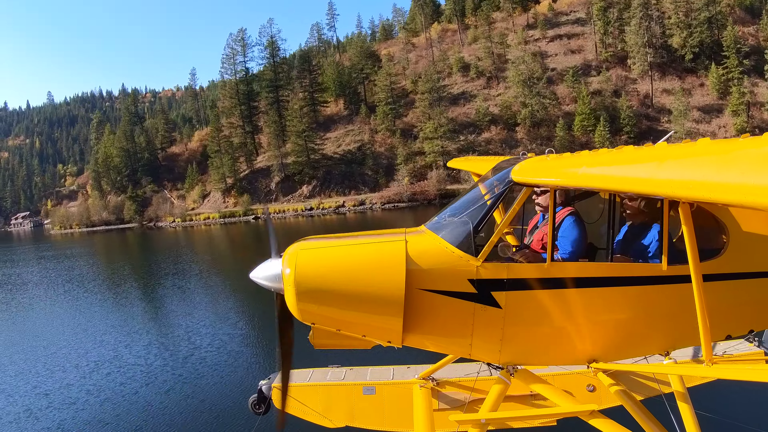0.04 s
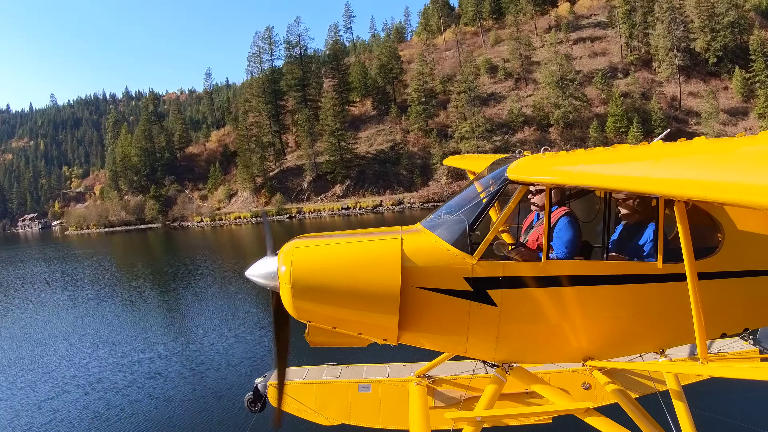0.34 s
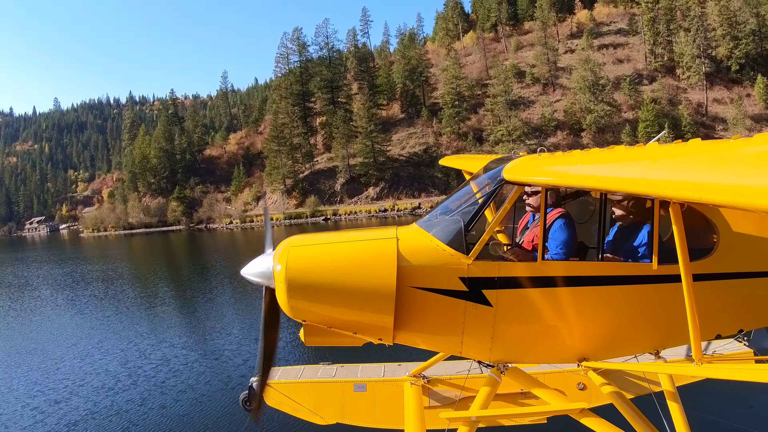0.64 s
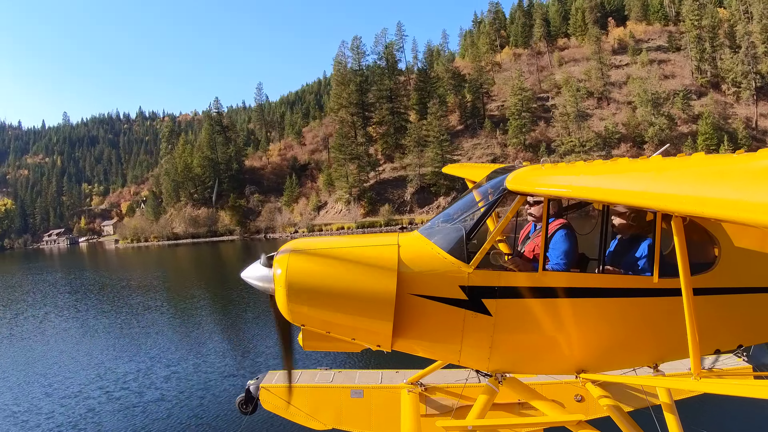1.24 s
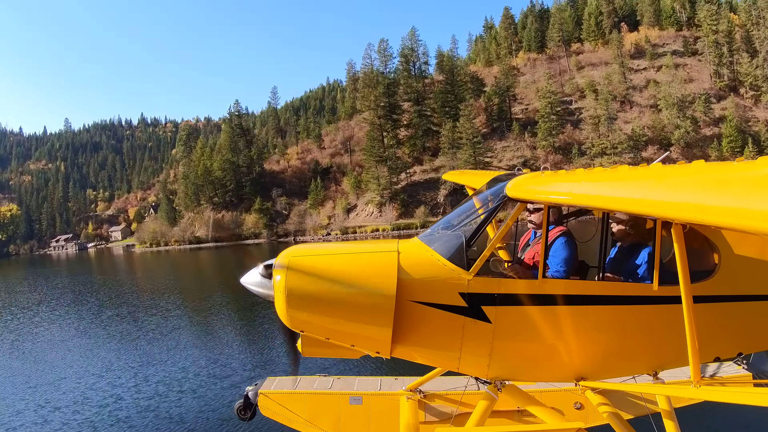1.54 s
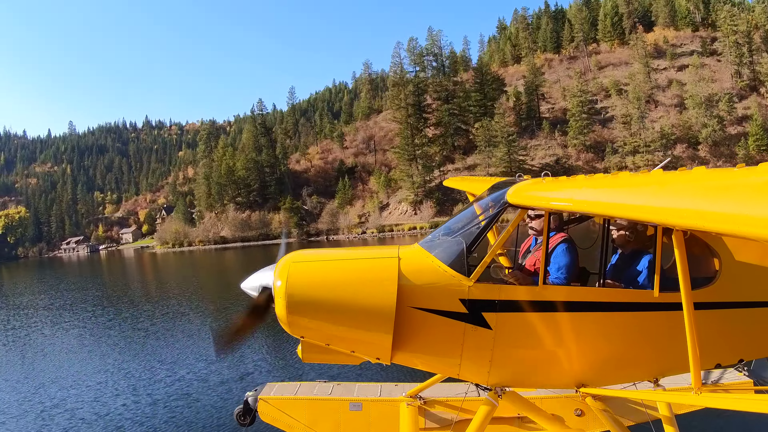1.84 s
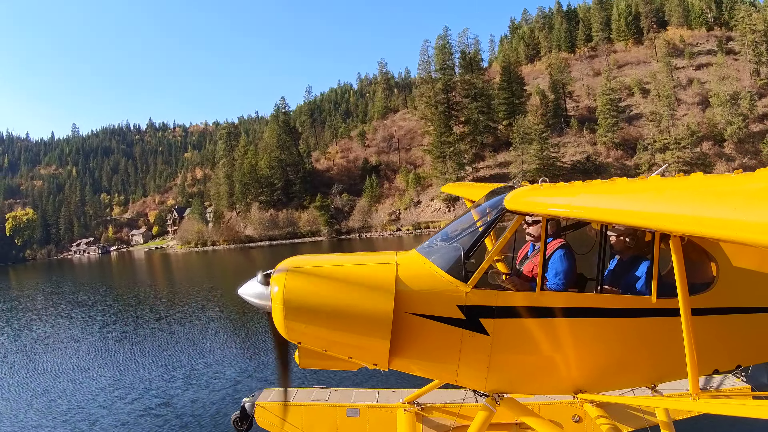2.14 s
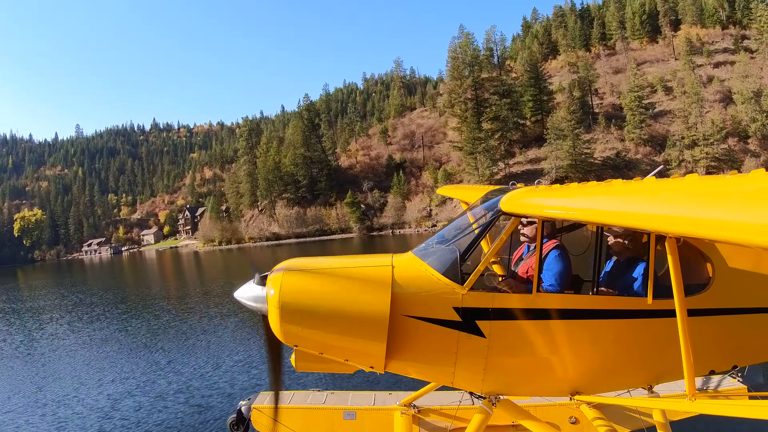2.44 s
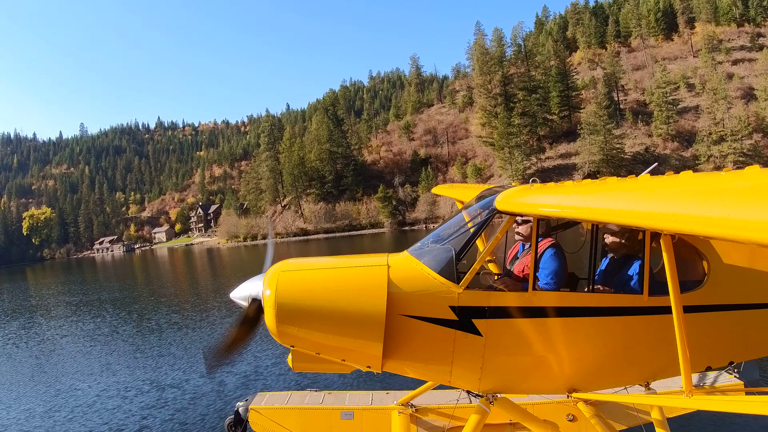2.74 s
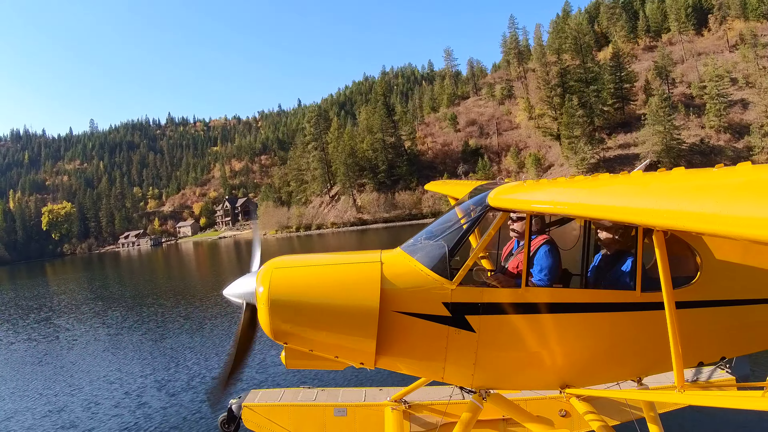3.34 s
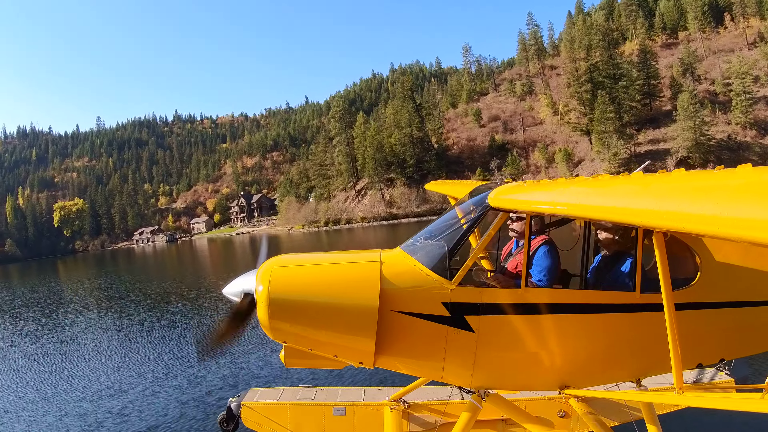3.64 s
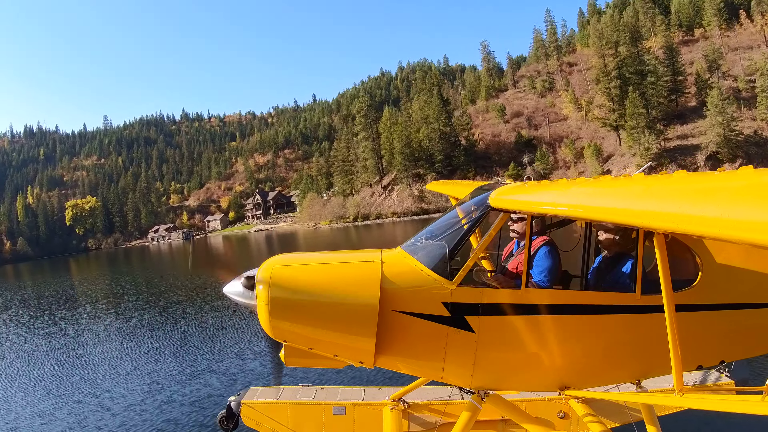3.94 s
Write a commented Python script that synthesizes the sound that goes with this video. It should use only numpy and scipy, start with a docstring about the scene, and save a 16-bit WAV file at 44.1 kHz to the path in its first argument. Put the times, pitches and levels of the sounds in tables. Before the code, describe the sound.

A single-engine floatplane drones over a lake, heard from a microphone in the airstream beside it. At first deep wind buffeting, spitting hiss and small hollow knocks cover it, then the drone swells and climbs in pitch.

```python
"""On a lake, a single-engine floatplane flies low, heard from a camera out in the airstream beside it.
Close up, wind buffets the microphone, rushes, hisses and now and then knocks and rattles the housing.
The drone of engine and propeller climbs out of the wind, rising in pitch.
The camera's fast limiter holds the rumble at one level."""
import sys
import numpy as np
from scipy import signal
from scipy.fft import rfft, irfft, next_fast_len
from scipy.io import wavfile
from scipy.ndimage import uniform_filter1d, minimum_filter1d, map_coordinates

SR = 44100
rng = np.random.default_rng(int(sys.argv[2]) if len(sys.argv) > 2 else 0)


def store_pcm(level_fs):
    """Save levels as 16-bit WAV."""
    pcm = np.round(np.clip(level_fs, -1, 1) * 32767).astype(np.int16)
    wavfile.write(sys.argv[1], SR, np.atleast_2d(pcm).T)


N = 176400

# Strength of the hiss and its spits at the microphone. Each row: time in seconds, relative level in dB.
HISS_STRENGTH = [(0, -44), (.7, -43.5), (1.08, -42.4), (1.26, -43.7), (1.6, -42.3), (1.85, -42.5),
                 (2.3, -43.5), (2.5, -44.5), (3.1, -45), (3.3, -45.3), (3.58, -46), (4, -45.5)]


def amp(db):
    """Decibels to gain."""
    return 10 ** (np.asarray(db) / 20)


def unit(x):
    """Scale to rms 1."""
    return x / np.sqrt(np.mean(x ** 2) + 1e-20)


def along(points, hz):
    """Read (Hz, value) points on a log axis."""
    freqs, values = np.transpose(points)
    return np.interp(np.log(hz + 1), np.log(freqs + 1), values)


def curves(rows):
    """One value per sample for each column after the time."""
    times, *columns = np.transpose(rows)
    return [np.interp(np.arange(N) / SR, times, column) for column in columns]


def humps(rows):
    """Sum of smooth bumps from (centre s, height, width s) rows."""
    t = np.arange(N) / SR
    return sum(height * np.exp(-np.pi * ((t - centre) / width) ** 2) for centre, height, width in rows)


def wobble(rate):
    """A smooth random curve, rate knots a second."""
    return map_coordinates(rng.standard_normal(size=4096), [np.arange(N) * rate / SR], mode="wrap")


def filtered(x, response):
    """Shape x by a gain that depends on frequency."""
    size = next_fast_len(N + SR // 2)
    return irfft(rfft(x, size) * response(np.fft.rfftfreq(size, 1 / SR)), size)[..., :N]


def airflow(spectrum, patchy_db, fine_db=0):
    """Stereo air noise with broad and fine patches of random gain: mono in the bass, wide up top."""
    # Each row: frequency in Hz, likeness of left and right (1 is mono).
    likeness = [(1800, 1), (2600, 1), (3600, 0.59), (5000, 0.44), (8000, 0.55), (15000, 0.2)]

    def patches(bins, frames):
        field = uniform_filter1d(rng.standard_normal(noise.shape[1:]), bins, axis=0)
        return unit(uniform_filter1d(field, frames, axis=1))

    def mid_side_gains(hz):
        spread = np.arccos(np.clip(along(likeness, hz), -1, 1)) / 2
        return amp(along(spectrum, hz)) * [np.ones_like(hz), np.tan(spread)]

    noise = signal.stft(rng.standard_normal((2, N)), nperseg=512)[2]
    flicker_db = patchy_db * patches(bins=16, frames=5) + fine_db * patches(bins=8, frames=2)
    pair = signal.istft(noise * amp(flicker_db), nperseg=512)[1][:, :N]
    mid, side = filtered(pair, mid_side_gains)
    return np.array([mid + side, mid - side]) / np.std(mid)


def buffet():
    """Eddies beat right on the microphone: a deep, lumpy rumble."""
    # Each row: time in seconds, level in dB.
    strength = [(0, -24.5), (1, -24), (1.6, -26), (2.2, -25), (2.8, -27.5), (3.4, -27.5), (4, -28)]
    # Each row: frequency in Hz, relative spectral density in dB.
    spectrum = [(15, -26), (36, -27), (50, -28), (65, -10), (85, -7), (115, -1.5), (150, 1), (190, -2.5),
                (240, -8), (295, -9), (350, -14.8), (420, -21), (550, -28), (900, -39.5), (2000, -99)]
    level_db, = curves(strength)
    return amp(level_db + 1.03 * wobble(rate=25.07)) * airflow(spectrum, patchy_db=-0.5)


def slipstream():
    """Air rushes and hisses close past the microphone; both layers flutter with the same eddies."""
    # Each row: time in seconds, relative level in dB.
    rush_strength = [(0, -44), (.5, -44), (1, -43), (1.25, -44.5), (1.8, -44), (2.3, -46.5), (2.75, -47.5),
                     (3.1, -46.8), (3.42, -46.5), (3.6, -49), (3.78, -48), (3.92, -46.5), (4, -49)]
    # Brief swells of the hiss. Each row: centre in seconds, rise in dB, width in seconds.
    surges = [(.39, 1.6, .03), (.55, 2.2, 0.036), (.83, 1, 0.018), (.885, 1.5, .02), (1.02, 1.7, 0.07),
              (1.49, 1, 0.027), (1.83, 2, .04), (2.27, 3, .025), (2.605, 3.5, 0.022), (2.99, 3, 0.05),
              (3.18, 2.6, .04), (3.395, 3, .055), (3.535, 4, .018), (3.68, 1.8, .08), (3.895, 3.5, 0.039),
              (3.945, 2.5, .02)]
    # Colour of each layer. Each row: frequency in Hz, relative spectral density in dB.
    rush_spectrum = [(150, -22), (400, 4), (600, 2), (820, 3), (1020, -2.5), (1150, -3), (1270, -1),
                     (1400, -5.5), (1850, -4.5), (2100, -8), (2450, -8), (3400, -14.5), (5000, -26.5),
                     (12000, -40)]
    hiss_spectrum = [(1500, -20), (2500, -13), (3500, -11), (4400, -5.2), (5100, -7.2), (6500, -2.5),
                     (7300, -1), (8050, 1.5), (9000, -2), (10500, -4), (15500, -6)]
    rush_gain_db, hiss_gain_db = 6.5, 2.1
    eddies, flutter = wobble(rate=30.4), wobble(rate=140)
    rush_db = curves(rush_strength)[0] + rush_gain_db + 0.093 * eddies + 0.4 * flutter
    hiss_db = curves(HISS_STRENGTH)[0] + hiss_gain_db + humps(surges) + 0.3 * eddies + 0.5 * flutter
    rush = amp(rush_db) * airflow(rush_spectrum, patchy_db=0.9)
    hiss = amp(hiss_db) * airflow(hiss_spectrum, patchy_db=1.75, fine_db=1.17)
    return rush + hiss


def spits():
    """Short splashy spits in the hiss, each a puff of noise in its own treble band."""
    count, gain_db, spread_db, stereo_width = 330, 1.2, 8, 0.7
    low_hz, high_hz, width_hz = 7000, 15700, 750
    mean_rise_s = 0.0032
    out, t = np.zeros((2, N + SR)), np.arange(2048) / SR
    hz = np.fft.rfftfreq(len(t), 1 / SR)
    for when, height, softness, life in rng.uniform(size=(count, 4)):
        centre_hz = low_hz + height * (high_hz - low_hz)
        band = np.exp(-((hz - centre_hz) / width_hz) ** 2)
        mid, side = irfft(rfft(rng.standard_normal((2, len(t)))) * band)
        noise = unit(np.array([mid + stereo_width * side, mid - stereo_width * side]))
        age = t / (mean_rise_s * (0.5 + life))
        puff = noise * age * np.exp(1 - age)
        out[:, int(when * N):][:, :len(t)] += amp(-spread_db * softness) * puff
    level_db, = curves(HISS_STRENGTH)
    return amp(level_db + gain_db) * out[:, :N]


def drone():
    """Engine and propeller alongside: four clean partials of one rising pitch, each wavering in level."""
    # Each row: time in seconds, fundamental in Hz.
    pitch = [(0, 36), (1.3, 44.7), (1.75, 48), (2, 50.3), (2.5, 54), (2.75, 55.3), (3, 56), (3.5, 57),
             (3.75, 57.25), (4, 57.9)]
    # Each row: time in seconds, levels of the first, second and third partials in dB.
    partial_levels = [(0, -62, -52, -49), (1.22, -66, -52, -33.5), (1.48, -61, -30, -42),
                      (2.12, -51, -30.5, -32), (2.33, -52, -29, -31), (2.65, -44, -30, -30.5),
                      (2.85, -42.5, -33, -25), (3.3, -40, -33, -28.5), (3.7, -39, -37, -25.5),
                      (4, -38, -39, -30.5)]
    fourth_db, waver_db = -48, -0.5
    hz, = curves(pitch)
    phase = 2 * np.pi * np.cumsum(hz) / SR
    out = np.zeros(N)
    for harmonic, db in enumerate(curves(partial_levels) + [fourth_db], 1):
        rms = amp(db + waver_db * wobble(rate=5.94))
        out += np.sqrt(2) * rms * np.sin(harmonic * phase + rng.uniform(0, 2 * np.pi))
    return out


def rattles():
    """Longer gusts shake the housing: a throaty swell in its hollow band, pulsing with quick contacts."""
    # Each row: centre in seconds, rms level at the crest in dB, width in seconds.
    gusts = [(.062, -41, .025), (1.22, -38, .032), (1.317, -34, 0.009), (2.398, -35.3, .06),
             (2.46, -36.2, .04), (2.552, -41, 0.028), (3.04, -38.5, 0.042)]
    # The housing's hollow band. Each row: frequency in Hz, relative spectral density in dB.
    housing_band = [(280, -27), (420, -2), (580, -3), (760, -1), (920, 0), (1080, -11), (1600, -35)]
    contacts_per_s, uneven_db = 300, 2.5
    swell = humps([(centre, amp(db), width) for centre, db, width in gusts])
    chatter = amp(uneven_db * wobble(contacts_per_s))
    return swell * unit(chatter * airflow(housing_band, patchy_db=1))


def knocks():
    """Wind jolts the housing: each knock swells quickly and rings roughly at its own hollow pitch."""
    # Each row: start in seconds, peak level in dB, pitch in Hz, time to fall 60 dB in seconds.
    jolts = [(.063, -34.5, 730, .05), (.127, -30.5, 720, 0.055), (.208, -31, 735, 0.054),
             (.306, -28.7, 695, .03), (.887, -31.5, 750, .03), (1.203, -30, 735, .03),
             (1.2945, -24, 700, .019), (1.3155, -26.5, 820, .014), (1.378, -25.5, 755, .08),
             (1.476, -33, 676, .05), (2.5255, -26, 740, 0.01), (3.463, -29, 740, 0.012)]
    attack_s, roughness_rad = 0.0023, 0.35
    out, t = np.zeros(N + SR), np.arange(SR // 8) / SR
    for start, db, hz, t60 in jolts:
        envelope = (1 - np.exp(-t / attack_s)) * amp(-60 * t / t60)
        jitter = roughness_rad * wobble(rate=400)[:len(t)]
        ring = np.sin(2 * np.pi * hz * t + jitter)
        out[int(start * SR):][:len(t)] += amp(db) * envelope / envelope.max() * ring
    return out[:N]


def scene():
    """At the microphone: wind on both channels; drone, knocks and rattles in the middle."""
    return buffet() + slipstream() + spits() + drone() + knocks() + rattles()


def record(dry):
    """The camera's fast look-ahead limiter, pressing hardest on the bass, then its band limit."""
    ceiling_db, hold_s = -17.5, 0.0056
    split_hz, top_hz = 450, 15900
    treble_share = 0.34  # the treble takes only this share of the cut in dB
    peak = np.abs(dry).max(axis=0)
    needed_gain = np.minimum(1, amp(ceiling_db) / (peak + 1e-9))
    span = int(hold_s * SR)
    gain = uniform_filter1d(minimum_filter1d(needed_gain, 2 * span), span)
    bass = filtered(dry, lambda hz: 1 / (1 + (hz / split_hz) ** 4))
    limited = bass * gain + (dry - bass) * gain ** treble_share
    return filtered(limited, lambda hz: hz < top_hz)


dry = scene()
out = record(dry)
store_pcm(out)
```